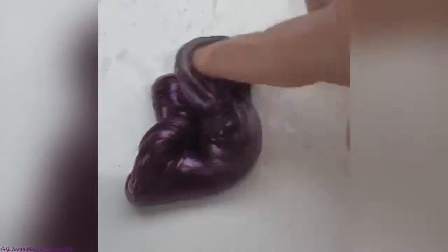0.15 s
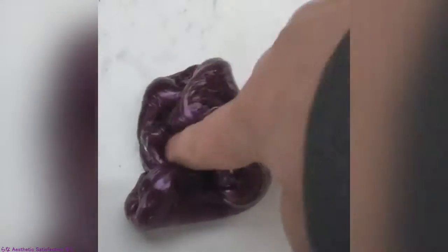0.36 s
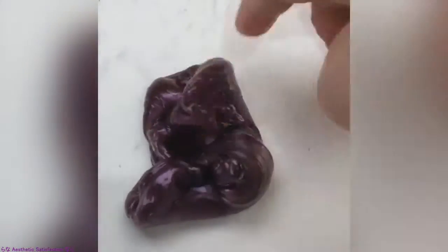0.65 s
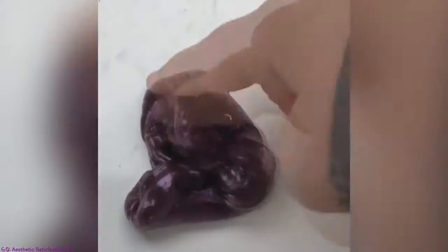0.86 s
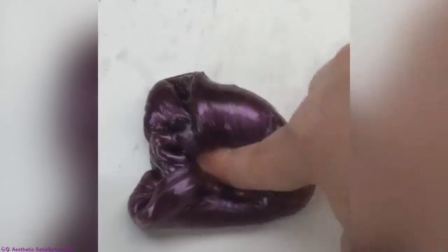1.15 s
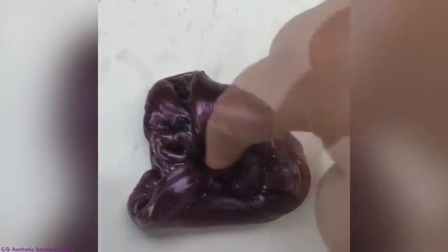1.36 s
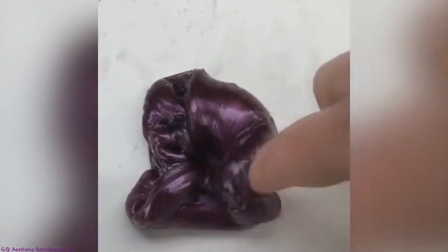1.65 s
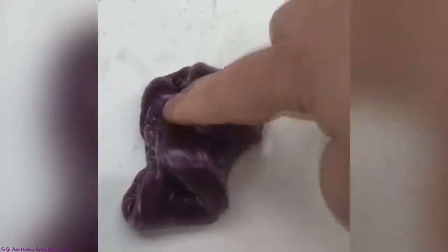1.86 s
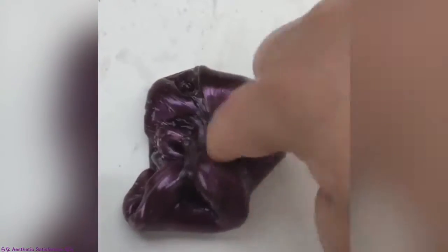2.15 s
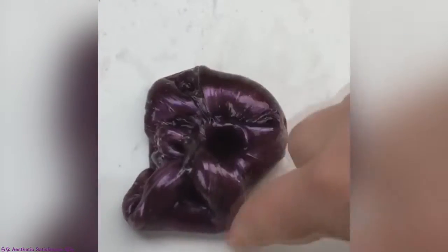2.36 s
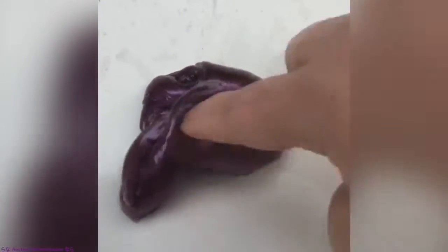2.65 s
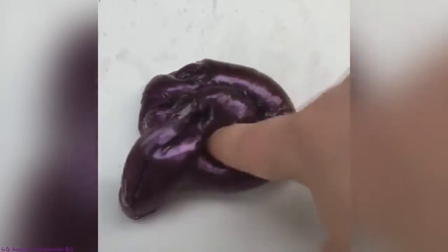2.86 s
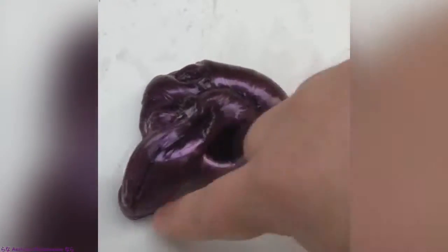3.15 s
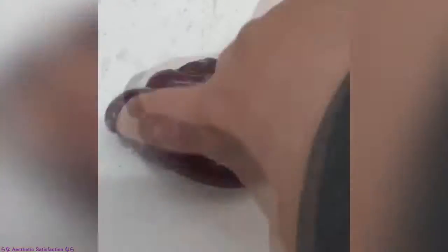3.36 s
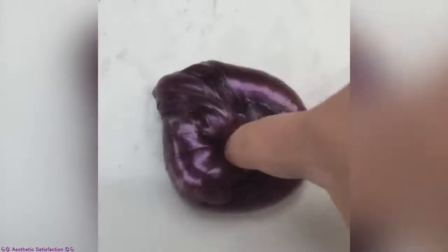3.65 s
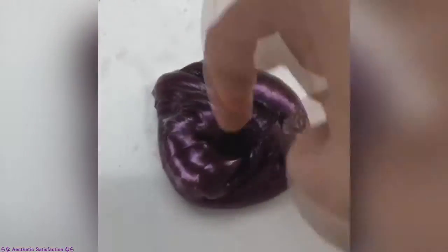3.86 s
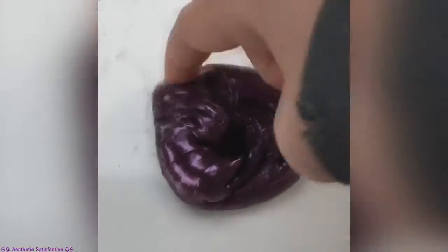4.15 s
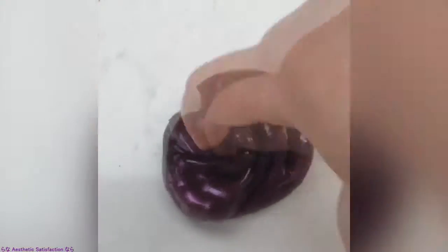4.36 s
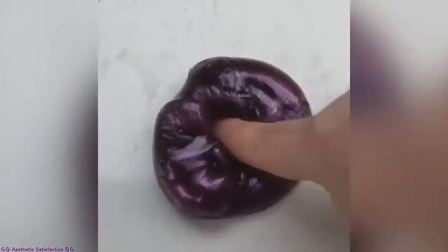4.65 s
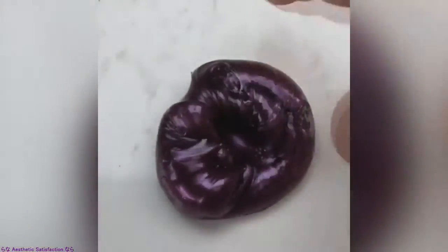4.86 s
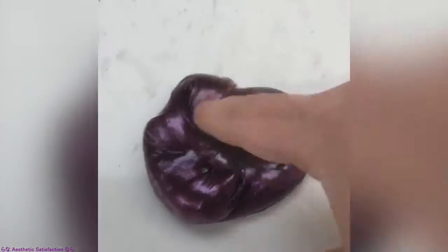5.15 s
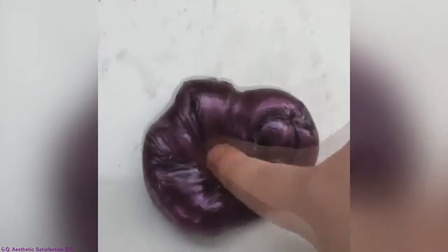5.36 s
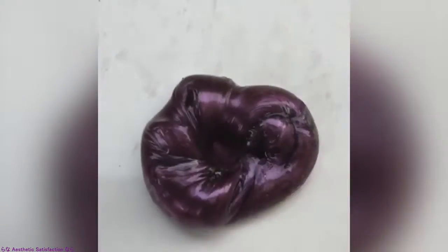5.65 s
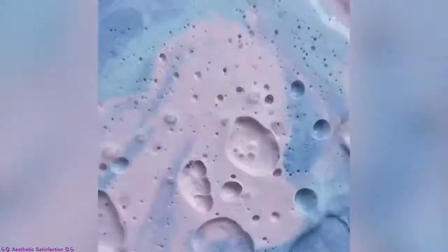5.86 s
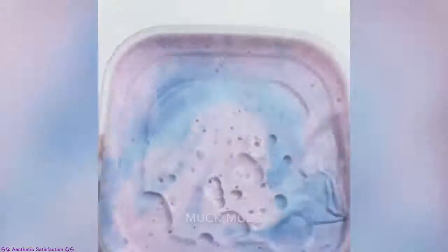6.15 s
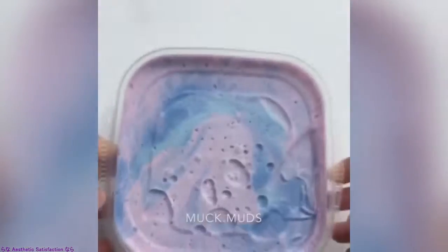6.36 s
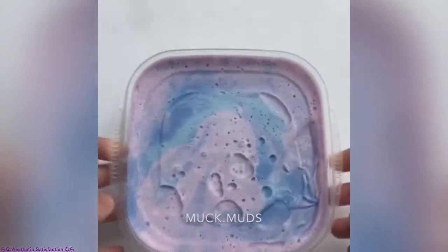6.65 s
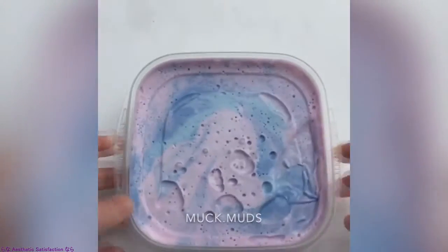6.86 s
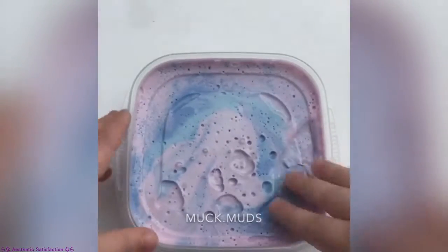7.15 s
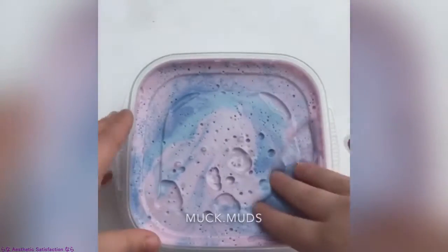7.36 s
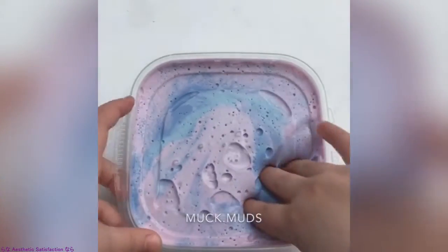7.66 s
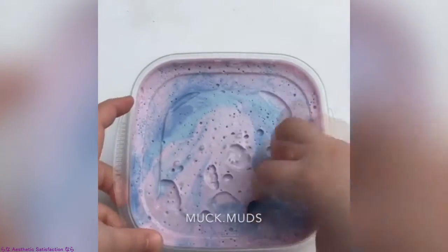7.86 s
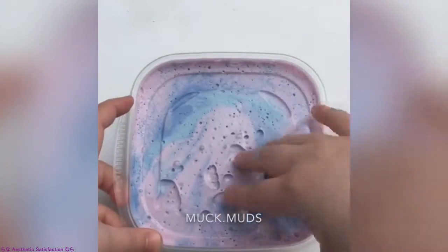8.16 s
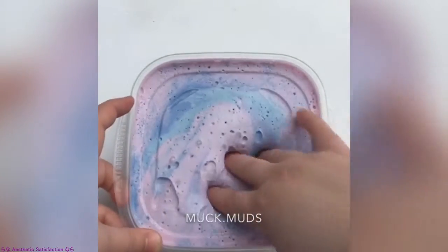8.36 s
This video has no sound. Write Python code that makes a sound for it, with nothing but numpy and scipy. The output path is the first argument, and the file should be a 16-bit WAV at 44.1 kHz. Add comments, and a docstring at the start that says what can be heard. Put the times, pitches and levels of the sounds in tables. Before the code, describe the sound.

Very close to the microphone, a finger pokes thick glossy slime on a table. Air pockets burst in a few loud, snappy, hollow pops with a small thud, separated by near quiet, tiny ticks and soft squelches. After about six seconds the place changes: a thin plastic tub rumbles in the hands, clatters down lightly, and fingers press foamy slime with faint fizz and small sticky smacks.

```python
"""Air pockets in glossy slime burst under a finger on a table: a tearing snap, a hollow ring and a thud.
Close to the microphone, bubbles tick as tiny noise bursts, folds squelch in crackle, pockets gulp one note.
After a short silence, in another room, a plastic tub rumbles, is set down and let go with struck modes,
and fingers press foamy slime that fizzes as dense crackle and smacks as they lift.
Coloured rumble and hiss lie behind each place."""
import sys
import numpy as np
from scipy import signal
from scipy.fft import rfft, irfft, next_fast_len
from scipy.io import wavfile
from scipy.ndimage import map_coordinates

SR = 44100
rng = np.random.default_rng(int(sys.argv[2]) if len(sys.argv) > 2 else 0)


def store_pcm(level_fs):
    """Save levels as 16-bit WAV."""
    pcm = np.round(np.clip(level_fs, -1, 1) * 32767).astype(np.int16)
    wavfile.write(sys.argv[1], SR, np.atleast_2d(pcm).T)


N = 375291
T = np.arange(N) / SR  # time in the whole scene [s]
AGE = np.arange(SR // 3) / SR  # time since one short sound began [s]

# Noise colours are scaled to rms 1 and mode strengths vary at each blow, so their levels are relative.
# Rumble of the first and second room: (frequency [Hz], level per Hz [dB])
FIRST_ROOM_AIR = [(34, -24), (58, -10), (81, 3), (167, -7.5), (210, -5), (244, -11), (302, -9), (375, -11),
                  (407, -12), (442, -13.5), (750, -22), (1010, -19), (1130, -22), (1360, -19), (3000, -32),
                  (3900, -43.5), (6600, -120)]
SECOND_ROOM_AIR = [(21, -38), (35, -18), (70, -1), (185, -11), (230, -3), (329, -12), (409, -12.5),
                   (562, -23.5), (608, -31), (645, -25.5), (1100, -25.5), (1710, -35.5), (4000, -49),
                   (5200, -82), (8800, -120)]
# Hiss colours of the first and second room: (frequency [Hz], level per Hz [dB])
FIRST_ROOM_HISS = [(900, -34), (1800, -2), (2800, -1), (6000, -2.5), (10500, -4), (16000, -10.5)]
SECOND_ROOM_HISS = [(2000, -30), (4200, 0.5), (7000, -3.5), (16000, -7)]
# Course of the first room's hiss, before its gain: (time [s], level [dB])
FIRST_HISS_COURSE = [(0.0, -61), (3.51, -53), (5.29, -63.5), (5.75, -60)]
# Decay of the small room's answer: (frequency [Hz], t60 [s])
ROOM_DECAY = [(100, 0.19), (700, 0.15), (1400, 0.065), (2500, 0.092), (9000, .055)]

# Plastic tub knocks and crinkles: (time [s], click level [dB], knock level [dB], thud level [dB])
TUB_BLOWS = [(6.8254, -35, -27, -28.5), (6.904, -34, -45.5, -35), (6.9125, -33, -48, -51),
             (6.9154, -27, -42, -32), (6.9219, -24, -36.5, -32), (6.941, -25.5, -53, -34),
             (6.9645, -29.5, -42, -43), (6.9793, -49, -65.5, -64)]
# Modes of the tub's thin wall: (frequency [Hz], level [dB], t60 [s])
TUB_MODES = [(308, -5, 0.048), (442, -1, 0.036), (610, 2, 0.05), (760, -3, .025), (996, -10, 0.054)]
# Colour of the tub's click: (frequency [Hz], level per Hz [dB])
CLICK_COLOUR = [(300, -7), (750, 9), (1500, 10), (3200, -2.5), (5500, -12), (9000, -15), (16000, -19)]
# Colour of the tub's rumble: (frequency [Hz], level per Hz [dB])
RUMBLE_COLOUR = [(25, -57), (70, 13.5), (130, 6), (175, 0.5), (260, 8.5), (450, -2), (620, -15.5),
                 (1500, -70)]
# Fingertips slipping on the tub: (time of the top [s], bell width [s], level [dB])
RUBS = [(6.128, 0.0034, -58), (6.22, 0.059, -67.5), (7.076, 0.0053, -43), (7.634, 0.015, -55),
        (8.056, .006, -54)]
# Colour of the slipping: (frequency [Hz], level per Hz [dB])
RUB_COLOUR = [(700, -14), (1250, 5), (1700, 4), (2150, -5), (3000, -20), (12000, -17)]

# Fingers pressing into the foam: (time of the top [s], bell width [s], level [dB])
PRESSES = [(7.042, 0.025, -60), (7.077, .006, -51), (7.526, 0.019, -58), (7.644, 0.027, -52),
           (7.687, 0.013, -59), (7.805, 0.048, -63), (7.987, 0.019, -54.5), (8.041, 0.012, -52.5),
           (8.49, .05, -66.5)]
# Colour of the breaking foam cells: (frequency [Hz], level per Hz [dB])
CELL_COLOUR = [(300, -10), (1600, 7), (3000, -5), (5500, -1.5), (9000, -4.5), (16000, -8.5)]
# Sticky fingertips pulling free of the foam: (time [s], level [dB])
SMACKS = [(7.7015, -40), (7.9803, -30), (7.995, -45), (8.0046, -27), (8.035, -43), (8.408, -47.5)]
# Colour of a smack: (frequency [Hz], level per Hz [dB])
SMACK_COLOUR = [(500, 8.5), (1500, 1.5), (2800, -14), (4300, 1), (6500, 2), (9000, -6), (16000, -27)]

# Small air pockets gulping under the finger: (time [s], frequency [Hz], level [dB])
BLIPS = [(1.394, 1345, -35.5), (1.414, 232, -22.5), (1.676, 170, -29.5), (1.841, 790, -42)]
# Soft squelches: (time of the top [s], bell width [s], thud level [dB], wet level [dB], fizz level [dB])
SQUELCHES = [(0.237, 0.029, -47, -54, -54.5), (0.588, 0.0025, -51, -44, -35.5),
             (1.401, 0.0064, -45, -43.5, -46.5), (1.421, 0.0089, -35.5, -56, -63),
             (1.681, 0.0032, -41, -44.5, -55), (2.521, 0.0092, -39, -65, -64),
             (3.54, 0.0038, -52, -44, -50), (4.824, 0.0036, -55, -44.5, -51),
             (4.847, 0.0097, -35, -41.5, -45), (5.165, 0.0023, -60, -50, -74)]
# Colours of the dull push, the wet folds and the fine fizz: (frequency [Hz], level per Hz [dB])
THUD_COLOUR = [(30, -30.5), (80, -3), (250, 3.5), (380, -10), (600, -26.5), (2000, -57.5)]
WET_COLOUR = [(200, -23), (550, 1.5), (950, -1.5), (1450, -6), (2500, -16.5), (6000, -28)]
FIZZ_COLOUR = [(500, -26), (2500, -1.5), (3800, -3.5), (5700, 3.5), (8000, -4.5), (16000, -11)]
# Tiny surface bubbles: (time [s], level [dB])
TICKS = [(.0278, -34.5), (0.317, -39), (1.044, -29.5), (1.3927, -35), (1.9214, -36), (3.5366, -28),
         (4.4197, -40), (4.6023, -36.5), (5.299, -25)]
# Colour of a tick: (frequency [Hz], level per Hz [dB])
TICK_COLOUR = [(500, -12), (3000, -14), (5300, 3.5), (7000, -5), (8700, 9.5), (11500, 1), (16000, -6)]

# Bursting air pockets: (time [s], snap level [dB], tear t60 [s], cavity frequency [Hz], cavity level [dB],
# cavity t60 [s], splat frequency [Hz], splat level [dB], knock level [dB], thud level [dB])
POPS = [(0.597, -6.5, 0.0037, 1460, 2.5, 0.0096, 1690, -12.5, -12.5, -26),
        (2.2457, -3.5, 0.0032, 1297, -5.5, 0.031, 2330, -15, -9.5, -18.5),
        (3.0571, -13, 0.012, 1550, 2, 0.0069, 2390, -19.5, -38.5, -23.5),
        (3.0615, -18, 0.022, 1424, -6.5, 0.041, 2140, -15, -18.5, -25.5),
        (3.9336, -9.5, 0.0073, 1510, -2, 0.021, 2400, -16.5, -14, -13),
        (5.6100, -23, 0.01, 1490, -15, 0.032, 2530, -17, -17.5, -19)]
# Colour of the tearing film: (frequency [Hz], level per Hz [dB])
SNAP_COLOUR = [(300, -25.5), (1500, -5), (2800, -11), (3900, -18.5), (5300, 3), (6800, -6.5), (8400, 1),
               (11500, -4.5), (16000, -6)]
# Modes of an opened cavity: (multiple of its frequency, level [dB], share of its t60)
CAVITY_MODES = [(1, 2, 0.63), (1.14, -11, 0.704), (.87, -8.5, 0.88)]
# The slime's skin knocking on the table top: (frequency [Hz], level [dB], t60 [s])
KNOCK_MODES = [(534.5, -14.5, 0.084), (693, -6, 0.034), (795, -11.5, .07), (979, 2, 0.023),
               (1293, -13.5, 0.086)]
# The table under a blow: (frequency [Hz], level [dB], t60 [s])
TABLE_MODES = [(86.4, 0.5, .12), (125.4, -6, 0.17), (169, -0.5, 0.037), (237, 0, 0.077), (330, -8, 0.066)]

# The first room starts to fade at its end time; the second is fully faded in at its start time.
FIRST_ROOM_END_S, SECOND_ROOM_START_S = 5.915, 6.02
FADE_OUT_DB_PER_S, FADE_IN_DB_PER_S = 1901.5, 540
GRIP_S, GRIP_RISE_S, LET_GO_S, LET_GO_FALL_S = 5.98, 0.06, 6.75, 0.17  # hands take the tub, then release it
CARRIED_DB, RESTING_DB = -39.5, -46  # tub rumble in the hands and on the table, before the wobble
WOBBLE_DB, WOBBLES_PER_S = 1.5, 14  # depth and rate of the rumble's random level wobble
CELLS_PER_S = 9000  # average rate of foam cells breaking
GRAIN_SPREAD_DB, GRAINS_PER_S = 2.5, 220  # foam cells give way in uneven clumps
BLIP_T60_S, BLIP_ATTACK_S = 0.066, 0.0027
STRETCH_DB, STRETCH_PER_S = -66.5, 120  # faint crackle of the slime's skin as it is kneaded
TOP_HZ = 16300  # upper end of the dulled treble, above which almost nothing is heard


def amp(db):
    """Decibels to gain."""
    return 10 ** (np.asarray(db) / 20)


def unit(x):
    """Scale to rms 1."""
    return x / np.sqrt(np.mean(x ** 2) + 1e-20)


def along(points, hz):
    """Values between (frequency [Hz], value) points on a log axis."""
    f, v = np.transpose(points)
    return np.interp(np.log(hz + 1), np.log(f), v)


def level(rows):
    """A (time [s], level [dB]) curve as a gain per sample."""
    return amp(np.interp(T, *np.transpose(rows)))


def add(track, s, x):
    """Mix x into the track from time s."""
    part = track[max(round(s * SR), 0):][:len(x)]
    part += x[:len(part)]


def swell(s, width):
    """A bell-shaped stroke around time s, cut off at four widths."""
    out = np.zeros(N)
    near = abs(T - s) < 4 * width
    out[near] = np.exp(-0.5 * ((T[near] - s) / width) ** 2)
    return out


def ramp(s, length):
    """A straight rise from 0 to 1 that starts at time s."""
    return np.clip((T - s) / length, 0, 1)


def wobble(rate):
    """A smooth random curve, rate knots a second."""
    knots = rng.standard_normal(int(N * rate / SR) + 4)
    return map_coordinates(knots, [T * rate])


def filtered(x, gain):
    """x times a gain that depends on frequency."""
    m = next_fast_len(len(x) + 8192)
    return irfft(rfft(x, m) * gain(np.fft.rfftfreq(m, 1 / SR)), m)[:len(x)]


def coloured(x, spectrum):
    """x with a given colour, at rms 1."""
    return unit(filtered(x, lambda hz: amp(along(spectrum, hz))))


def steady_noise(spectrum):
    """Coloured noise through the whole scene, at rms 1."""
    return coloured(rng.standard_normal(N), spectrum)


def crackle(spectrum, per_second):
    """Tiny clicks of uneven size at random times, coloured, at rms 1."""
    sizes = rng.laplace(size=N)
    breaks = rng.random(N) < per_second / SR
    return coloured(sizes * breaks, spectrum)


def burst(spectrum, t60, rise=0.00027):
    """A short tearing noise whose energy is set by its length."""
    fade = amp(-60 * AGE / t60)
    noise = coloured(rng.standard_normal(len(AGE)), spectrum)
    shaped = noise * fade * (1 - np.exp(-AGE / rise))
    return unit(shaped) * np.sqrt(np.mean(fade ** 2))


def ring(modes, attack):
    """Damped modes, struck at slightly new strengths and random phases each time."""
    hz, db, t60 = np.transpose(modes)[:, :, None]
    db = db + rng.standard_normal(hz.shape)
    phase = 2 * np.pi * (hz * AGE + rng.random(hz.shape))
    modes_sum = np.sum(amp(db - 60 * AGE / t60) * np.sin(phase), 0)
    return modes_sum * (1 - np.exp(-AGE / attack))


def room(x, wet_db, delay):
    """One sound with the small room's answer: delayed noise dying per frequency, new at each call."""
    hz, t, z = signal.stft(rng.standard_normal(len(AGE)), SR, nperseg=256)
    decay = amp(-60 * t / along(ROOM_DECAY, hz)[:, None])
    tail = signal.istft(z * decay, SR, nperseg=256)[1]
    tail = np.pad(tail / np.linalg.norm(tail), (round(delay * SR), 0))
    return x + amp(wet_db) * signal.fftconvolve(x, tail)[:len(x)]


def background():
    """Room rumble and hiss as coloured noise; the first room fades out and the second fades in."""
    first_hiss = amp(2) * level(FIRST_HISS_COURSE) * steady_noise(FIRST_ROOM_HISS)
    first = amp(-46.0) * steady_noise(FIRST_ROOM_AIR) + first_hiss
    second = amp(-43.5) * steady_noise(SECOND_ROOM_AIR) + amp(-71.5) * steady_noise(SECOND_ROOM_HISS)
    fade_out = amp(-FADE_OUT_DB_PER_S * np.maximum(T - FIRST_ROOM_END_S, 0))
    fade_in = amp(-FADE_IN_DB_PER_S * np.maximum(SECOND_ROOM_START_S - T, 0))
    return first * fade_out + second * fade_in


def tub():
    """The thin plastic rumbles in the hands, knocks on the table and crinkles; fingertips slip on it."""
    rumble_db = CARRIED_DB + (RESTING_DB - CARRIED_DB) * ramp(LET_GO_S, LET_GO_FALL_S)
    rumble_db = rumble_db + WOBBLE_DB * wobble(WOBBLES_PER_S)
    out = ramp(GRIP_S, GRIP_RISE_S) * amp(rumble_db) * steady_noise(RUMBLE_COLOUR)
    for s, click_db, knock_db, thud_db in TUB_BLOWS:
        click = amp(click_db) * burst(CLICK_COLOUR, t60=0.0079)
        knock = amp(knock_db) * ring(TUB_MODES, attack=0.00034)
        thud = amp(thud_db) * ring(TABLE_MODES, attack=0.0023)
        add(out, s, room(click + knock, wet_db=-12, delay=0.003) + thud)
    slipping = sum(amp(db) * swell(s, width) for s, width, db in RUBS)
    return out + crackle(RUB_COLOUR, per_second=6000) * slipping


def foam():
    """Each press swells and fades as a fine fizz, and sticky fingertips smack as they lift."""
    pressure = sum(amp(db) * swell(s, width) for s, width, db in PRESSES)
    clumps = unit(amp(GRAIN_SPREAD_DB * wobble(GRAINS_PER_S)))
    out = pressure * clumps * crackle(CELL_COLOUR, CELLS_PER_S)
    for s, db in SMACKS:
        smack = burst(SMACK_COLOUR, t60=0.0077)
        add(out, s, amp(db) * room(smack, wet_db=-10, delay=0.0026))
    return out


def blips():
    """A small pocket closes with one soft, short damped note."""
    out = np.zeros(N)
    for s, hz, db in BLIPS:
        add(out, s, ring([(hz, db, BLIP_T60_S)], attack=BLIP_ATTACK_S))
    return out


def squelches():
    """The finger sinks in: a dull push, with air squeezed through wet folds."""
    push = steady_noise(THUD_COLOUR)
    wet = crackle(WET_COLOUR, per_second=2500)
    fizz = crackle(FIZZ_COLOUR, per_second=4000)
    out = np.zeros(N)
    for s, width, thud_db, wet_db, fizz_db in SQUELCHES:
        out += swell(s, width) * (amp(thud_db) * push + amp(wet_db) * wet + amp(fizz_db) * fizz)
    return out


def ticks():
    """Tiny bubbles in the skin snap with no body; fainter ones crackle all through the kneading."""
    stretch = crackle(FIZZ_COLOUR, STRETCH_PER_S)
    out = amp(STRETCH_DB) * stretch * (T < FIRST_ROOM_END_S)
    for s, db in TICKS:
        tick = burst(TICK_COLOUR, t60=0.0062)
        add(out, s, amp(db) * room(tick, wet_db=-18, delay=0.0023))
    return out


def pops():
    """The film tears, its wet rim splats, the opened cavity rings, and the collapsing slime thumps the table."""
    # wet rim: (multiple of the splat frequency, level per Hz [dB])
    rim = [(0.12, -16.5), (0.33, -10.5), (0.75, -11), (1, -1), (1.2, -5), (1.6, -18.5), (4, -30)]
    out = np.zeros(N)
    for s, snap_db, tear, hz, cavity_db, t60, splat_hz, splat_db, knock_db, thud_db in POPS:
        snap = amp(snap_db) * burst(SNAP_COLOUR, tear, rise=0.00052)
        rim_colour = [(splat_hz * k, db) for k, db in rim]
        splat = amp(splat_db) * burst(rim_colour, t60=0.017, rise=0.00054)
        modes = [(hz * k, db, t60 * share) for k, db, share in CAVITY_MODES]
        cavity = amp(cavity_db) * ring(modes, attack=0.0009)
        knock = amp(knock_db) * ring(KNOCK_MODES, attack=0.00071)
        thud = room(ring(TABLE_MODES, attack=0.0046), wet_db=-13.5, delay=0.008)
        # the film starts to give
        out += amp(snap_db - 28) * swell(s - 0.0005, 0.0027) * crackle(FIZZ_COLOUR, per_second=7100)
        add(out, s, room(snap, wet_db=-25.5, delay=0.0086))
        add(out, s, room(splat + cavity + knock, wet_db=-8.5, delay=0.002995))
        add(out, s + 0.0062, amp(-15) * (splat + cavity))  # a near surface throws the pop back
        add(out, s + 0.004, amp(thud_db) * thud)
    return out


def scene():
    """Both slimes, close to the microphone, over their rooms."""
    far = background() + tub() + foam()
    near = blips() + squelches() + ticks() + pops()
    return (far + near)[None]


def record(dry):
    """The deepest bass rolls off, the treble is dull from 12 kHz, and almost nothing passes the band limit."""
    # treble cut: (frequency [Hz], level [dB])
    shelf = [(12000, 0), (12400, -15), (TOP_HZ - 500, -16), (TOP_HZ, -28), (TOP_HZ + 600, -90)]
    bass_cut = signal.butter(2, 40, "highpass", fs=SR, output="sos")
    x = signal.sosfilt(bass_cut, dry[0])
    return filtered(x, lambda hz: amp(along(shelf, hz)))[None]


dry = scene()
out = record(dry)
store_pcm(out)
```